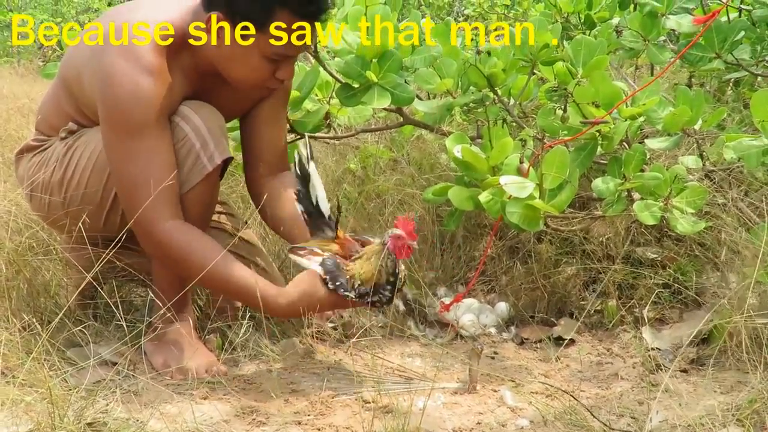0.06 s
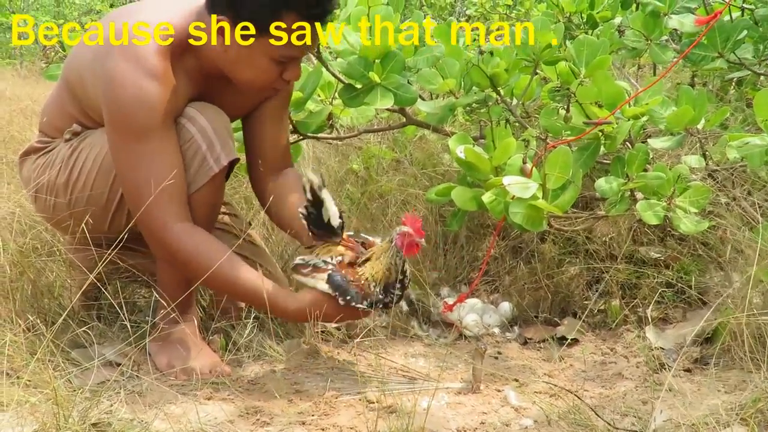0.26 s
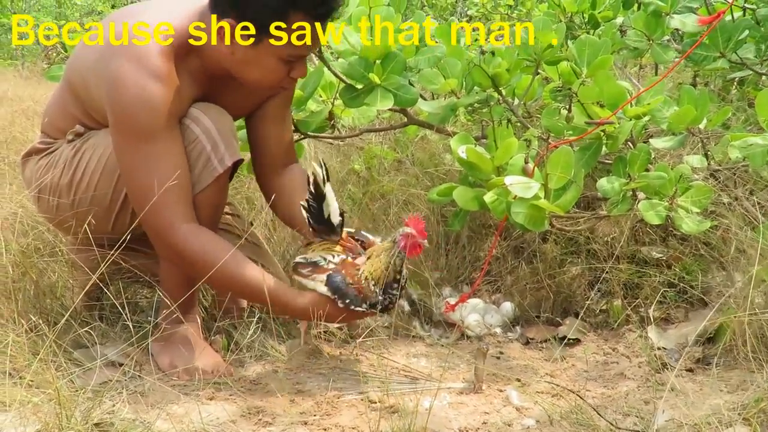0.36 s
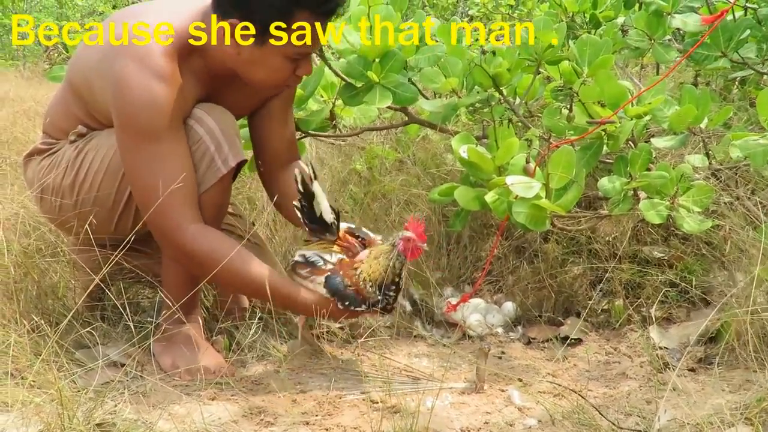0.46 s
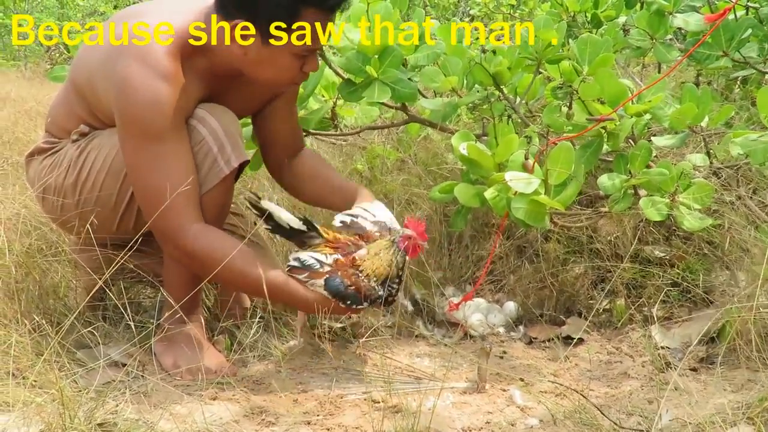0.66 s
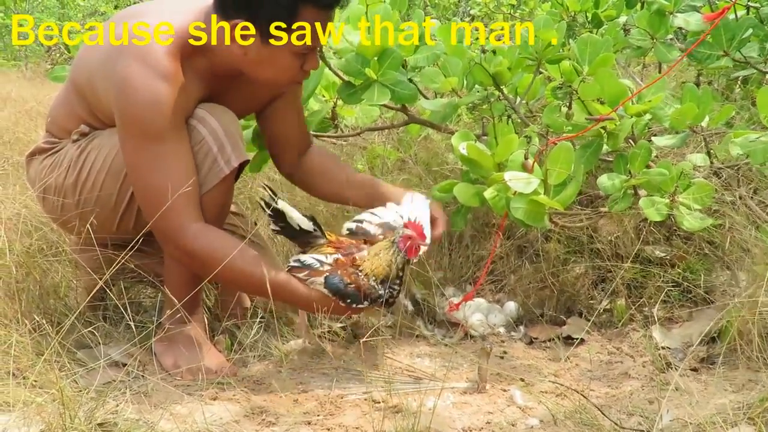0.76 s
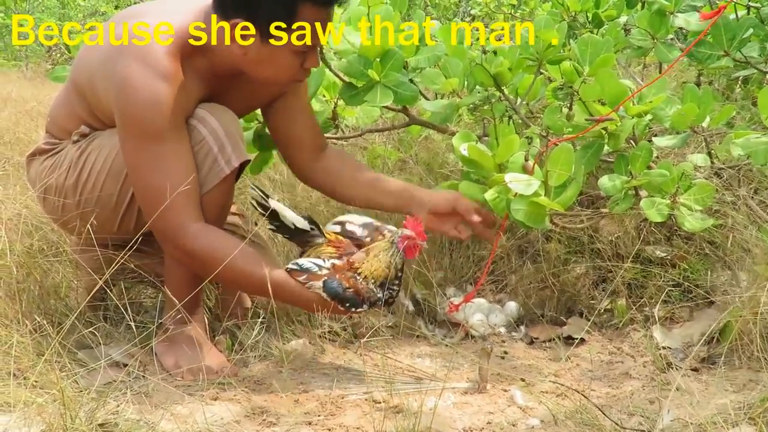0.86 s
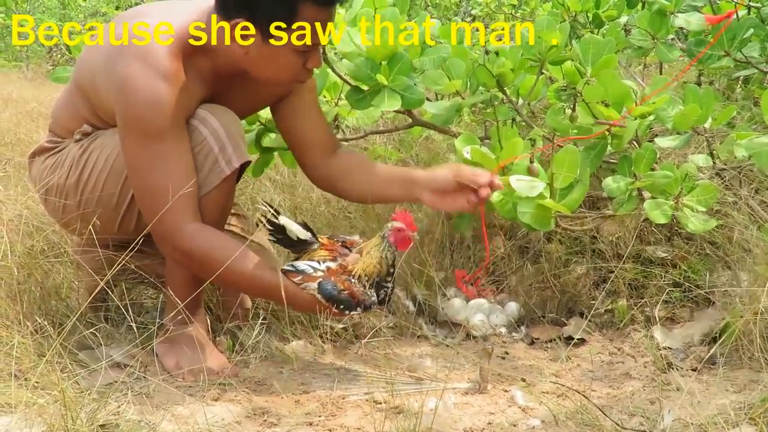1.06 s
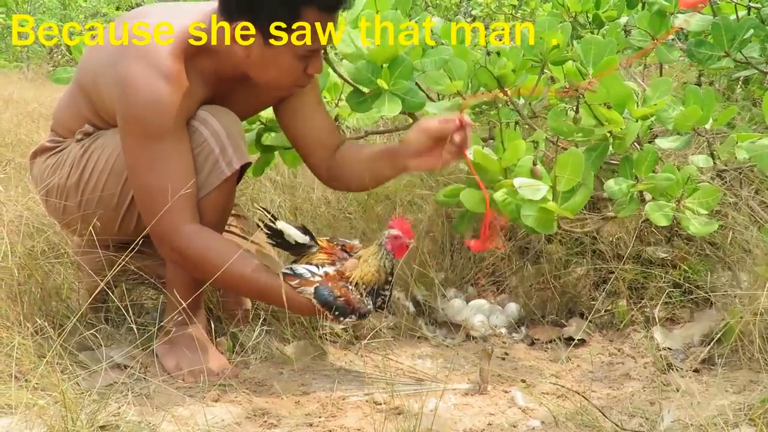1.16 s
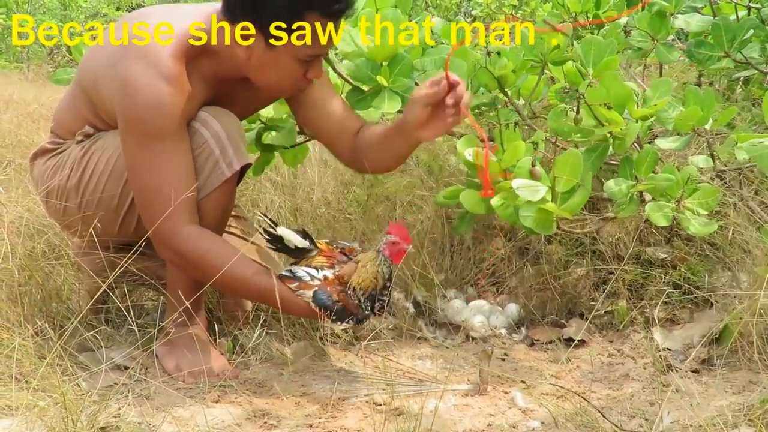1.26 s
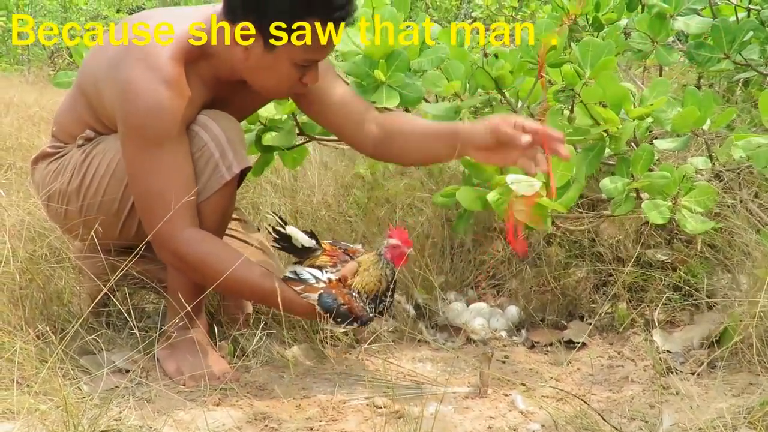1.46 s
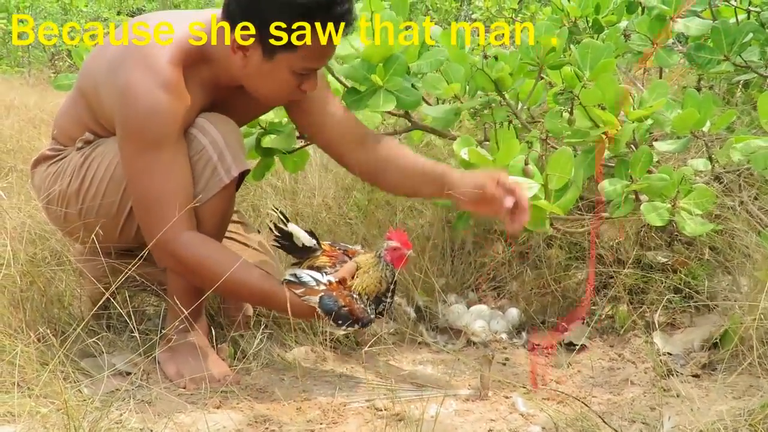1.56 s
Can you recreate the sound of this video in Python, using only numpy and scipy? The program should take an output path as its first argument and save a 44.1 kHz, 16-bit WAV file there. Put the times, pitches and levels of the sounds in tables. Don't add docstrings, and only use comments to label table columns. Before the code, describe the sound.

A rooster clucks close by at about 0.22 s, rounded and ringing, then more briefly and roughly at 0.48 s, dropping to a duller note. Bushes scatter it faintly. Soft leaf rustling grows from 0.85 s, with twig snaps sharpest near 1.2 s. Dull, wide wind thumps buffet the microphone around 0.9-1.0 and 1.28-1.34 s. Quiet outdoor air, throbbing insect hum and barely audible bird chirps lie underneath.

```python
import sys
import numpy as np
from scipy import signal
from scipy.io import wavfile
from scipy.ndimage import uniform_filter1d

SR = 44100
rng = np.random.default_rng(int(sys.argv[2]) if len(sys.argv) > 2 else 0)


def generate_wav(sig):
    pcm = np.round(np.clip(np.atleast_2d(sig).T, -1, 1) * 32767).astype(np.int16)
    wavfile.write(sys.argv[1], SR, pcm)


def amplitude_ratio(level_db):
    exponent = np.asarray(level_db, float) / 20
    return 10 ** exponent


N = 70560
MIRROR = np.array([[1], [-1]])


def in_time(rows):
    times, *columns = np.transpose(rows)
    return [np.interp(np.arange(N) / SR, times, column) for column in columns]


def at_hz(points, hz):
    table_hz, values = np.array(points)[:, 0], np.array(points)[:, 1]
    return np.interp(np.log(hz), np.log(table_hz), values)


def rms_one(x):
    return x / np.sqrt(np.mean(x ** 2) + 1e-20)


def drift(rate_hz):
    r = np.exp(-2 * np.pi * rate_hz / SR)
    wander = signal.lfilter([1], [1, -2 * r, r * r], rng.standard_normal(N + SR))
    return rms_one(wander[SR:])


def band(x, lo_hz, hi_hz, order=2):
    edges = [lo_hz, min(hi_hz, SR / 2 - 2000)]
    return signal.sosfilt(signal.butter(order, edges, "band", fs=SR, output="sos"), x)


def coloured(white, spectrum, likeness):
    out = 0
    edges = 30 * 2 ** np.arange(0, 9.1, .5)
    for k, (low, high) in enumerate(zip(edges, edges[1:])):
        mid, side = band(white[k % 2], low, high)
        hz = np.sqrt(low * high)
        alike = np.clip(at_hz(likeness, hz), -1, 1)
        stereo = np.sqrt(1 + alike) * mid + np.sqrt(1 - alike) * side * MIRROR
        out = out + amplitude_ratio(at_hz(spectrum, hz) + 1.64 * drift(7.7)) * stereo
    return rms_one(out)


def distant_air():
    # (frequency [Hz], level [dB per Hz])
    air_tone = [(24, -32), (40, -16.5), (401, -1), (527, -15.5), (659, 1), (765, -8.5), (2110, -16.5),
                (2850, -19.5), (15000, -44.5)]
    # (frequency [Hz], left-right likeness [-1 to 1])
    air_likeness = [(60, 0.3), (130, -0.2), (290, -0.53), (630, -0.7), (1390, 0.46), (3050, 0.21),
                    (6700, 0.1), (14700, -0.7)]
    return amplitude_ratio(-49.5) * coloured(rng.standard_normal((2, 2, N)), air_tone, air_likeness)


def insect_hum():
    # (frequency [Hz], width [Hz], level [dB])
    resonances = [(661.4, 20.5, -59.5), (402.8, 33, -64.5), (622, 100, -62)]
    throb_db = 2.5
    out = 0
    for hz, width_hz, db in resonances:
        noise = rng.standard_normal((2, N + SR))
        mid, side = band(noise, hz - width_hz / 2, hz + width_hz / 2)[:, SR:]
        out = out + rms_one(mid + .5 * side * MIRROR) * amplitude_ratio(db + throb_db * drift(5.8))
    return out


def far_birds():
    # (time [s], length [s], pitch [Hz], level [dB])
    chirps = [
        (0.024, 0.058, 5380, -67),
        (0.86, 0.015, 7850, -72),
    ]
    s = np.arange(N) / SR
    out = 0
    for at, length, hz, db in chirps:
        swell = np.sin(np.pi * np.clip((s - at) / length, 0, 1))
        phase = 2 * np.pi * np.cumsum(hz * (1 + .006 * drift(90))) / SR
        out = out + amplitude_ratio(db) * swell * np.sin(phase)
    return out


def cluck(rows, chest_db):
    # (frequency [Hz], gain [dB])
    throat = [(550, -8), (800, 1), (1090, 4.5), (1660, 3), (2020, -23.5), (2200, -15), (2900, -31),
              (3800, -23.5), (4400, -39.5)]
    throat_fall_db_per_oct, jitter, phase_turn = -8, .006, .12
    soft_chest, soft_db = .6, -33
    hz, db, tilt_db, rough = in_time(rows)
    hz = hz * (1 + jitter * drift(120) * (.2 + 5 * rough))
    phase = 2 * np.pi * np.cumsum(hz) / SR
    voice, power = 0, 0
    for k in range(1, 17):
        octaves_above = np.log2(np.maximum(k * hz / throat[-1][0], 1))
        gain_db = at_hz(throat, k * hz) + throat_fall_db_per_oct * octaves_above
        gain_db = gain_db + tilt_db * max(np.log2(k / 2), 0)
        if k == 1:
            gain_db = gain_db + chest_db + soft_chest * np.maximum(soft_db - db, 0)
        gain = amplitude_ratio(gain_db)
        shake = np.minimum(rough * k * (1 + k / 8), .9)
        swing = np.cos(k * phase - phase_turn * k * k + shake * drift(250))
        voice = voice - gain * (1 + .7 * shake * drift(250)) * swing
        power = power + gain ** 2 / 2
    s = np.arange(N) / SR
    rasp = amplitude_ratio(3) * rough * rms_one(band(rng.standard_normal(N), 600, 1900, order=3))
    sounding = (s > rows[0][0]) * (s < rows[-1][0])
    return (voice / np.sqrt(power) + rasp) * amplitude_ratio(db) * sounding


def rooster():
    # (time [s], pitch [Hz], level [dB], brightness [dB per octave], roughness [0-1])
    cluck_one = [(.2205, 520, -58, -6, .2), (.225, 505, -27, -1, .08), (.233, 528, -22.5, -9, .03),
                 (.251, 546, -21.5, 1, .022), (.262, 553, -23, 0, .035), (.2665, 610, -26, -4, .18),
                 (.271, 620, -31, -5, .26), (.276, 710, -41, -3, .3), (.281, 720, -60, -5, .3)]
    cluck_two = [(.475, 610, -54, -14, .05), (.484, 540, -40, -8, .07), (.487, 490, -28, 3, .11),
                 (.4915, 520, -27.5, -9, .11), (.494, 560, -25, -12, .13), (.4965, 600, -31, 0, .2),
                 (.500, 540, -39, 7, .4), (.505, 500, -42, 4, .45), (.522, 480, -54, 0, .5)]
    cluck_tail = [(.498, 400, -56, -12, .06), (.502, 405, -38, -14, .04), (.507, 398, -36, -16, .03),
                  (.511, 405, -42, -16, .04), (.517, 410, -60, -16, .1)]
    voice = cluck(cluck_one, chest_db=1.5) + cluck(cluck_two, chest_db=7.5) + cluck(cluck_tail, chest_db=-6.5)
    echo_s, echo_db = 0.069, -25.5
    s = np.arange(int(.12 * SR)) / SR
    scatter = rng.standard_normal((2, len(s))) * np.exp(-s / echo_s) * (s > .004)
    scatter = scatter / np.sqrt(np.sum(scatter ** 2, axis=1, keepdims=True))
    return voice + amplitude_ratio(echo_db) * signal.fftconvolve(voice[None], scatter)[:, :N]


def snaps():
    # (time [s], peak level [dB], frequency [Hz], 60 dB decay [s])
    twig_snaps = [(0.577, -47, 885, 0.084), (0.585, -51.5, 2960, 0.034), (0.844, -52, 3480, 0.026),
                  (1.099, -53.5, 6060, 0.027), (1.13, -50.5, 3840, 0.028), (1.169, -49, 1800, 0.093),
                  (1.183, -45.5, 3150, 0.017), (1.1835, -42, 1950, 0.029), (1.183, -46, 5270, 0.019),
                  (1.185, -49, 2750, 0.082), (1.192, -42.5, 1590, 0.031), (1.2241, -30, 1840, 0.0077),
                  (1.2353, -34, 2150, 0.0055), (1.2352, -47, 2940, 0.006), (1.24, -36, 2310, 0.018),
                  (1.243, -40, 1720, 0.047), (1.248, -48.5, 4200, 0.071), (1.257, -49, 7000, 0.038),
                  (1.259, -46, 2640, 0.023), (1.274, -49, 2610, 0.041), (1.274, -45.5, 1810, 0.063),
                  (1.284, -44, 1700, 0.045), (1.323, -54, 1540, 0.045), (1.364, -52, 1330, 0.084),
                  (0.399, -52.5, 1690, 0.2), (.544, -62, 1510, 0.073), (0.689, -53, 1160, 0.088),
                  (0.795, -52, 1410, 0.066), (.995, -61, 12500, 0.11)]
    width_ratio, rise_s, length = 1.195, 0.00064, 2400
    s = np.arange(length) / SR
    out = np.zeros((2, N))
    for (at, db, hz, t60), noise in zip(twig_snaps, rng.standard_normal((len(twig_snaps), 3, length))):
        ring = rms_one(band(noise[0] + 0.18 * noise[1:], hz / width_ratio, hz * width_ratio))
        envelope = np.minimum(s / rise_s, 1) * amplitude_ratio(db - 60 * s / max(t60, .003))
        start = int(at * SR)
        out[:, start:start + length] += ring * envelope
    return out


def brushing():
    # (time [s], level [dB])
    strokes = [(.82, -79), (.87, -70), (.93, -69), (.98, -63), (1.035, -63), (1.06, -70), (1.095, -65),
               (1.14, -68), (1.185, -62.5), (1.225, -73), (1.255, -62), (1.285, -63), (1.31, -71),
               (1.345, -66), (1.4, -76), (1.6, -86)]
    # (frequency [Hz], level [dB per Hz])
    brush_tone = [(800, -31.5), (1500, -4), (3000, 3.5), (6000, 0), (10000, -9), (15000, -5.5)]
    # (frequency [Hz], left-right likeness [-1 to 1])
    brush_likeness = [(1000, 0.57), (15000, 0.86)]
    grains_per_s = 12000
    struck = rng.random((2, 2, N)) < grains_per_s / SR
    grains = struck * rng.standard_normal((2, 2, N)) * amplitude_ratio(1.2 * drift(60))
    level_db = in_time(strokes)[0]
    return coloured(grains, brush_tone, brush_likeness) * amplitude_ratio(level_db + 4.5)


def eddies():
    # (time [s], level [dB], pitch [Hz], difference over sum of the ports [dB])
    gust_eddies = [(0.891, -22, 197, 2.5), (0.902, -17, 115, 3), (0.902, -12.5, 236, 12),
                   (0.912, -17.5, 324, 12.5), (0.918, -22.5, 407, 10.5), (0.919, -15.5, 199, 7),
                   (0.929, -20, 295, 13.5), (0.941, -19.5, 179, 8.5), (0.946, -20.5, 93, -0.5),
                   (0.951, -15, 180, 10.5), (0.961, -22.5, 163, 13), (0.989, -24.5, 159, 13),
                   (1.001, -17, 157.4, 8), (1.052, -36.5, 121, 15), (1.063, -37.5, 78, -9),
                   (1.064, -39, 150, 20), (1.141, -36, 88.5, 4), (1.166, -33.5, 100, 4.5),
                   (1.216, -38, 71, -1), (1.275, -14, 168, 8), (1.286, -20, 199, 9),
                   (1.29, -19.5, 95.5, -10), (1.304, -16, 185, 10.5), (1.312, -25, 156, -16),
                   (1.316, -24, 370, 8), (1.325, -16, 230, 14), (1.343, -24, 150, 43),
                   (1.405, -37, 149, -7), (1.46, -35.5, 114, -23), (1.508, -41.5, 146, -4),
                   (.725, -52, 66, 0), (1.113, -44, 69.4, 5), (1.181, -47, 50.3, -6), (1.4, -39, 64, -17),
                   (1.502, -44, 61, -23), (1.351, -40, 172, -1), (0.869, -41, 89, -1),
                   (1.296, -40.5, 337, -1), (0.93, -25, 110, 14)]
    length_cycles, top_hz = 0.7, 480
    lead, scatter, veer_s = 1.4, .1, 1.03
    s, out = np.arange(N) / SR, np.zeros((2, N))
    turns = rng.uniform(0, 2 * np.pi, (len(gust_eddies), 2))
    for (at, db, hz, side_db), (start, stray) in zip(gust_eddies, turns):
        cycles = (s - at) * hz
        side_lead = lead * np.sign(veer_s - at) + scatter * (stray - np.pi)
        turn = start + np.array([[0], [side_lead]])
        share = np.array([[1], [amplitude_ratio(side_db)]]) / np.sqrt(1 + amplitude_ratio(side_db) ** 2)
        swell = np.exp(-.5 * (cycles / length_cycles) ** 2)
        out += amplitude_ratio(db) * share * swell * np.cos(2 * np.pi * cycles + turn)
    out = signal.sosfilt(signal.butter(6, top_hz, fs=SR, output="sos"), out)
    strength = np.sqrt(uniform_filter1d(np.sum(out ** 2, axis=0), size=1100) + 1e-12)
    out[1] += amplitude_ratio(-17) * strength * rms_one(band(rng.standard_normal(N), 132, 416, order=7))
    return out


def breeze():
    # (time [s], level [dB])
    breeze_level = [(0, -62.5), (.3, -64.5), (.68, -64.5), (.72, -49.5), (.76, -67), (.85, -51),
                    (.89, -33.5), (.96, -41), (1.03, -44.5), (1.09, -59.5), (1.2, -53), (1.258, -43),
                    (1.285, -33.5), (1.34, -46.5), (1.42, -58), (1.47, -48.5), (1.55, -57.5), (1.6, -53)]
    lumps_db, side_db = 3, -7.5
    level_db = in_time(breeze_level)[0]
    noise = band(rng.standard_normal((2, N + SR)), 40, 150)[:, SR:]
    return rms_one(noise) * amplitude_ratio(level_db + lumps_db * drift(32)) * amplitude_ratio(np.array([[0], [side_db]]))


def wind():
    mid, side = eddies() + breeze()
    return mid + side * MIRROR


def scene():
    return distant_air() + insect_hum() + far_birds() + rooster() + snaps() + brushing() + wind()


def low_pass(x):
    return signal.sosfilt(signal.butter(12, 15290, fs=SR, output="sos"), x)


def record(dry):
    x = signal.sosfilt(signal.butter(2, 24, "high", fs=SR, output="sos"), dry)
    x = signal.sosfilt(signal.cheby2(10, 60, 15900, fs=SR, output="sos"), x)
    return low_pass(x)


dry = scene()
out = record(dry)
generate_wav(out)
```